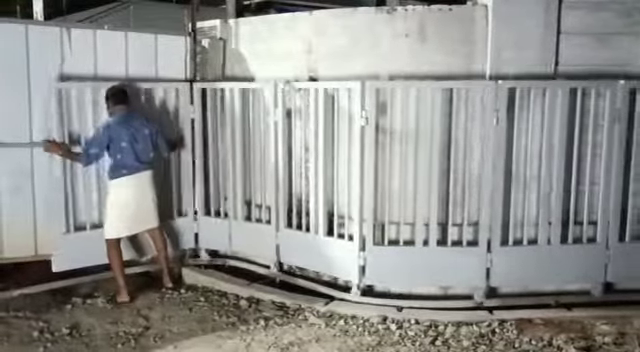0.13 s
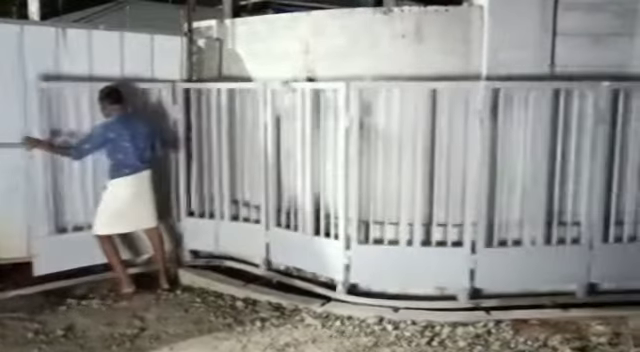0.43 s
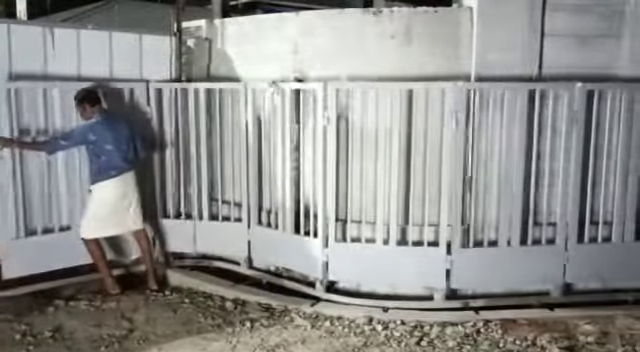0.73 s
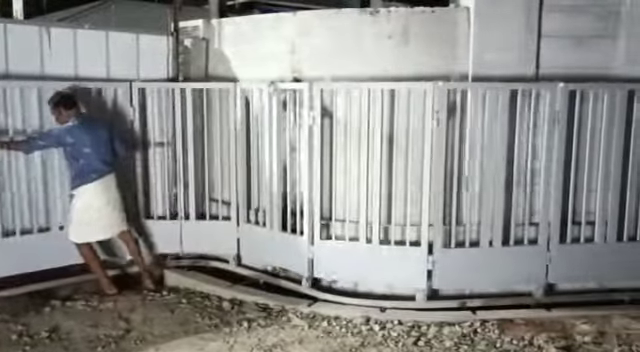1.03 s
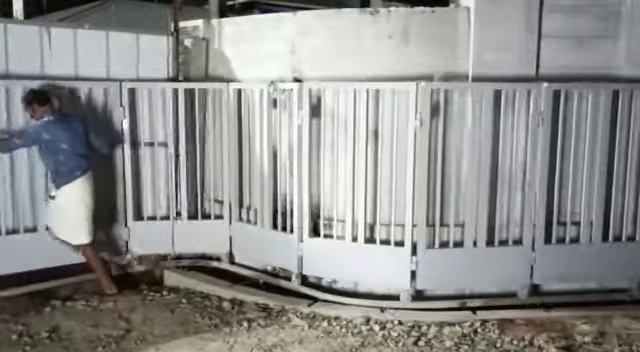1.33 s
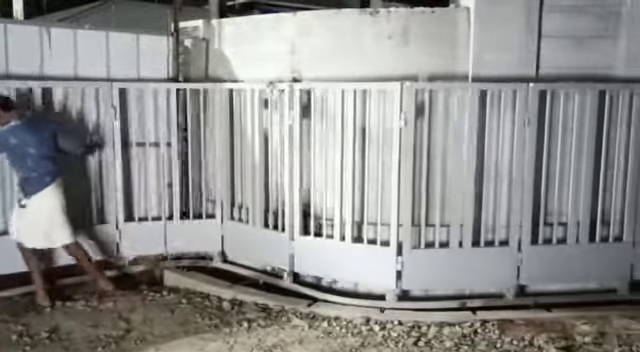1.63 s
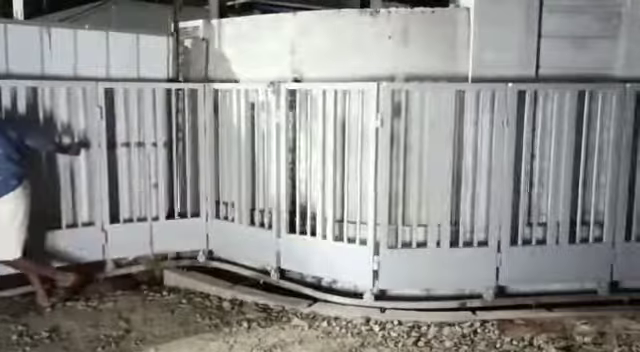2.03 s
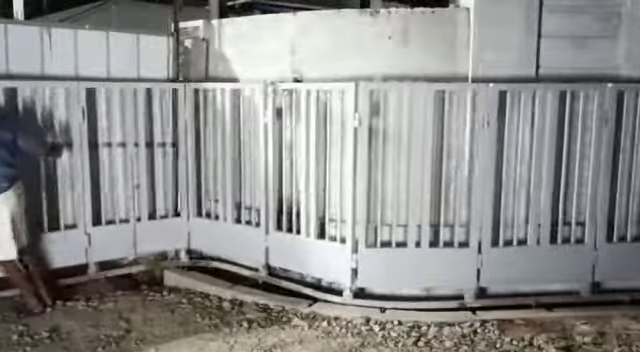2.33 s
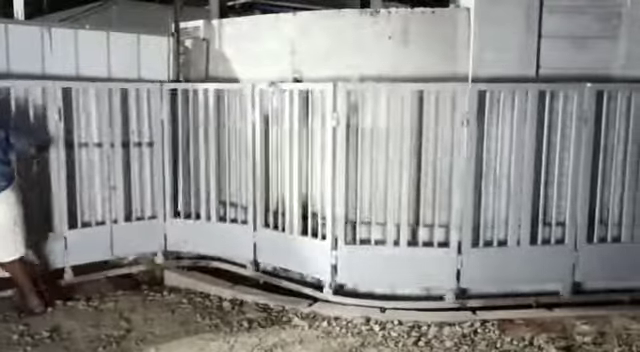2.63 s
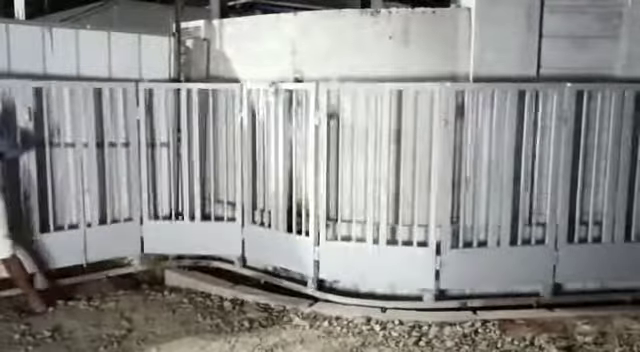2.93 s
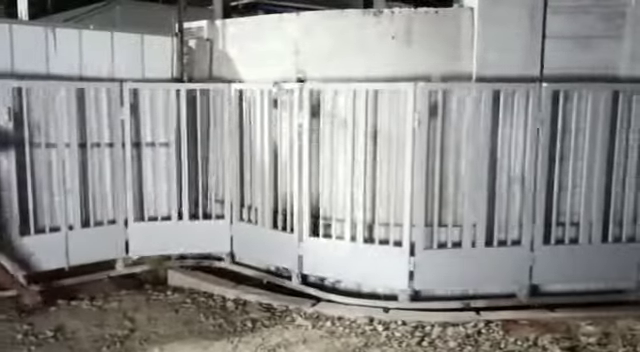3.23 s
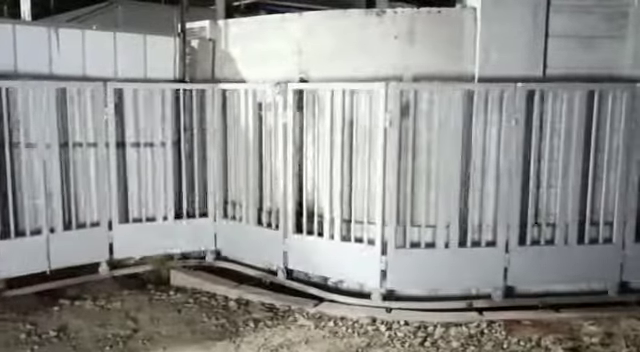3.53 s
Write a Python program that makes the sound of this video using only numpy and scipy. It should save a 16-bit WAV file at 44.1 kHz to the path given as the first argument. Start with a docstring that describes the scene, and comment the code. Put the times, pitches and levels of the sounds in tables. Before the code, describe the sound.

A folding steel gate rolls along a ground track outdoors, its hollow panels rumbling and its bars buzzing. Loose hinges rattle, then a ringing knock and a hard clank sound. The rolling grows louder, with another ring near the end.

```python
"""Over a low outdoor drone, a folding steel gate is pushed along a curved ground track between walls.
From the start its wheels make the hollow panels rumble and the bars buzz, and one wheel sings faintly.
Soon the loose hinges rattle and clink and the wheels clack. At 1.65 s a knock sets a loose bar ringing;
at 2.24 s two leaves slam together with a clank. The gate rolls on, louder as it gathers way,
with lighter knocks of the leaves, and the bar rings again near the end."""
import sys
import numpy as np
from scipy import signal
from scipy.fft import rfft, irfft
from scipy.io import wavfile
from scipy.ndimage import uniform_filter1d

SR = 44100
rng = np.random.default_rng(int(sys.argv[2]) if len(sys.argv) > 2 else 0)


def to_wav(sig):
    """Store sig (one row per channel, or 1-D mono) as 16-bit WAV at the path in sys.argv[1].

    Samples outside -1..1 are clipped; the rate is SR.
    """
    pcm = np.clip(np.atleast_2d(sig), -1, 1) * 32767
    pcm = np.round(pcm).astype(np.int16)
    wavfile.write(sys.argv[1], SR, pcm.T)  # frames by channels


N = 162288
T = np.arange(N) / SR

# How alike the two microphones sound. Each row: frequency in Hz, coherence from 0 to 1.
COHERENCE = [(60, 1), (160, 0.92), (300, 0.89), (550, 0.66), (1000, 0.36), (2000, 0.047), (4000, 0.037),
             (8000, 0.06)]
# Stereo tilt. Each row: frequency in Hz, left over right in dB.
STEREO_TILT = [(200, 0), (1400, 0), (2100, -2), (2450, -6), (3100, .5), (4200, -3), (5000, -1.5),
               (6200, 7.5), (7600, 6.5), (8400, 2), (12000, -0.5)]
# Echo of the yard and dense ringing of the gate. Each row: frequency in Hz, t60 in seconds.
YARD_DECAY = [(150, 0.14), (1000, 0.79), (3000, 0.5), (8000, 0.28), (15000, 0.057)]

# Tone colours of the sources. Each row: frequency in Hz, relative level in dB.
OUTDOOR_COLOUR = [(20, -52), (45, -23), (58, -37), (76, 7.5), (95, 5.5), (125, -4.5), (250, -10),
                  (1000, -56), (8000, -66), (15000, -35.5)]
PANEL_COLOUR = [(25, -33), (55, -38), (90, -8), (122, -9), (170, -4.5), (230, -3.5), (295, -2), (390, -1),
                (450, -6), (520, -20.5), (900, -23), (2500, -79)]
BAR_COLOUR = [(200, -18), (480, -3), (620, 3), (760, 2.5), (880, 5), (1150, 0), (1400, -5), (1900, -2),
              (2800, -11), (4500, -11.5), (4900, -22.5), (6000, -22), (6700, -16), (8400, -20), (9200, -56),
              (13000, -34), (15500, -52)]
HINGE_COLOUR = [(300, -28.5), (900, 8.5), (2000, 5), (2800, 4.5), (3300, 7.5), (4550, 6), (4900, -3),
                (6000, -4), (6400, -0.5), (6780, 8.5), (7050, -16), (7500, 7.5), (7750, -37), (8450, -1),
                (9000, -74), (12500, -16.5), (15500, -30)]
CLACK_COLOUR = [(300, -30), (1000, -19), (2200, -6), (2600, 3), (3200, 0), (3800, 9), (4500, 0),
                (5100, -13.5), (7000, -17), (8500, -8), (9500, -67), (15500, -66)]
PIN_COLOUR = [(500, -35), (1400, -19), (1700, 4.5), (2350, -3.5), (2800, 2), (3700, -5), (4500, -5),
              (5200, -13), (6000, -8), (6500, 4), (7100, -3), (7500, 9.5), (7850, -0.5), (8400, 2),
              (9300, -42), (13000, -16.5), (15500, -55)]
LEAF_COLOUR = [(100, -1), (500, -11.5), (830, -4.5), (1150, 1.5), (1350, -10), (1700, 3.5), (2300, 1),
               (3000, -14), (4100, -3), (5200, -14), (6200, -23.5), (6800, -8), (8300, -10.5), (9300, -49),
               (12500, -30), (15500, -38)]

# Fader curves of the rolling sounds. Each row: time in seconds, relative level in dB.
RUMBLE_FADER = [(0.0, -36), (0.08, -43.5), (0.11, -37.5), (0.16, -41), (0.22, -36), (0.66, -35),
                (1.98, -35.5), (2.07, -31.5), (2.51, -28), (2.53, -29.5), (2.92, -27.5), (3.14, -30.5),
                (3.35, -28), (3.68, -27.5)]
BOOM_FADER = [(0, -50), (.12, -42.5), (.9, -45), (1.35, -47), (1.9, -45.5), (2.15, -42), (2.5, -36.5),
              (2.85, -38), (3.05, -43.5), (3.3, -32.5), (3.5, -32.5), (3.68, -40.5)]
BUZZ_FADER = [(0, -46), (.3, -43), (.7, -41.5), (1.25, -43), (1.55, -42), (1.85, -44), (2.15, -40),
              (2.6, -37.5), (2.9, -38.5), (3.1, -38.5), (3.25, -34.5), (3.5, -37.5), (3.68, -34)]
SQUEAL_FADER = [(0, -67), (.13, -58), (.42, -60), (.55, -64), (1.2, -80), (1.35, -62), (1.45, -80)]

# Panel resonances and the leaves' lowest modes. Each row: pitch in Hz, width in Hz, relative level in dB.
PANEL_MODES = [(190, 25, -9), (212, 14.6, -9.5), (230.7, 17.7, -10.5), (252.9, 13.8, -12.5),
               (284.5, 17, -13), (332.8, 18.6, -11.5), (365.7, 15.3, -14), (401, 29.5, -12)]
BOOM_MODES = [(138.9, 15, -4.5), (166.8, 12, -1)]
# Ringing of the steel parts. Each row: pitch in Hz, relative level in dB, t60 in seconds.
FRAME_MODES = [(820, -2.5, .45), (884, -8, .4), (996, -7, .2), (1098, -5, .27), (1142, -5, .25),
               (1467, -7, .38), (1665, 1, .43), (1695, -3, .25), (1785, 0, .24), (1850, -5, .2),
               (1971, -3, .26), (2132, -6, .33), (2254, -5, .18), (2317, 0, .24), (2369, -6, .27),
               (2676, -7, .3), (2707, -3.5, .38), (3115, -11, .26), (3450, -6, .24), (4080, -9.5, .22)]
HINGE_MODES = [(3120, -5, .14), (4060, -6, .06), (4600, -7, .08), (6390, -4, .1), (6715, -3, .08),
               (6800, -2, .08), (7360, 0, .08), (7470, -2, .08), (7560, -2, .09), (7635, -4, .12),
               (7980, -7, .08), (8390, -6, .08)]
LOOSE_BAR_MODES = [(1640, -2, .14), (1717, 0, .25), (2130, -7, .2), (2295, 1, .11), (3354, -13, .3),
                   (4129, -13, .3), (7470, -3, .08), (7639, -3, .22), (8420, -6, .1)]

# Bursts of hinge chatter. Each row: start and length in seconds, relative level and treble in dB.
RATTLES = [(0.298, 0.056, -41.5, -13), (0.446, 0.083, -42.5, -14), (0.673, 0.074, -41.5, -9),
           (0.811, 0.032, -45, 2.5), (0.927, 0.035, -44.5, -2), (1.017, 0.09, -41, -1),
           (1.182, 0.025, -48.5, -1), (1.287, 0.025, -44, -14), (1.361, 0.025, -42, -3.5),
           (1.525, 0.087, -47.5, -2), (1.922, 0.034, -37, 1), (2.008, 0.035, -40, -0.5),
           (2.173, 0.1, -42, -18), (2.264, 0.19, -35.5, 5.5), (2.557, 0.036, -39.5, 2),
           (2.644, 0.028, -37.5, 0), (2.725, 0.045, -37, -4.5), (2.864, 0.045, -36.5, 2),
           (2.927, 0.026, -36.5, 5), (3.184, 0.033, -39, -20), (3.215, .12, -37, -6.5),
           (3.39, 0.034, -39, -4), (3.461, 0.043, -38, 0.5), (3.573, 0.051, -34.5, 1.5)]
# Wheel clacks. Each row: start in seconds, relative level and treble in dB, decay time in seconds.
CLACKS = [(.302, -45, 5, .009), (.332, -44, -13, 0.01), (1.53, -38.5, 3, 0.0098), (1.925, -40, 16.5, 0.01),
          (2.272, -24, -14, 0.0055), (2.368, -20, -10, .007), (2.713, -29.5, -2.5, 0.0043),
          (2.929, -34, -6, 0.0093), (3.468, -41, -8, .006)]
# Knocks of the hinge pins. Each row: start in seconds, relative level and treble in dB.
CLINKS = [(.447, -41.5, -0.5), (.671, -38, 2), (.705, -37, 0), (1.022, -41, -10), (1.527, -42.5, -2),
          (1.645, -39, 3), (1.655, -35, 2.5), (1.938, -32.5, -3), (2.086, -37, -15), (2.304, -39, 3.5),
          (2.417, -41, 0), (2.542, -53, 5), (2.648, -37.5, -7.5), (2.883, -36.5, -1), (3.363, -35, 3),
          (3.372, -29, 5.5)]
# Strikes on the loose bar. Each row: start in seconds, relative level and treble in dB.
PINGS = [(1.647, -12.5, -8), (1.654, -8, -3), (3.371, -13, 10), (3.376, -3, -9)]
# The leaves knock together; the hardest blow bounces.
# Each row: start in seconds, relative level and treble in dB, frame ring in dB above that level.
CLANKS = [(1.655, -39, 16, -2), (2.199, -41, -11, 20), (2.2427, -20.5, 5.5, 13), (2.2455, -17.5, 5, 24),
          (2.26, -22.5, -22, 12), (3.221, -33.5, -16, 21), (3.376, -26.5, -12, 12), (3.6, -44, -7, 19)]


def amp(db):
    """Decibels to gain."""
    return 10 ** (np.asarray(db) / 20)


def unit_rms(x):
    """Scales to an rms of one."""
    return x / np.sqrt(np.mean(x ** 2) + 1e-20)


def unit_energy(x):
    """Scales a stereo response to an average energy of one per channel."""
    return x / np.sqrt(np.sum(x ** 2) / 2 + 1e-20)


def at_hz(points, hz):
    """Reads a table along log frequency."""
    freqs, values = np.transpose(points)
    return np.interp(np.log(hz + 1), np.log(freqs + 1), values)


def fader(points):
    """Gain over time from a dB curve."""
    return amp(np.interp(T, *np.transpose(points)))


def add(mix, start_s, sound):
    """Drops a sound into the mix at its cue."""
    part = mix[:, round(start_s * SR):][:, :sound.shape[1]]
    part += sound[:, :part.shape[1]]


def convolve(x, response):
    """Plays a signal through a stereo response."""
    return signal.fftconvolve(np.atleast_2d(x), response, axes=1)[:, :N]


def colour(pair, tone):
    """Gives two unrelated signals a tone colour and the stereo width of the microphones."""
    hz = abs(np.fft.fftfreq(pair.shape[1], 1 / SR))
    log_gain = np.log(amp(at_hz(tone, hz)))
    eq = np.exp(np.conj(signal.hilbert(log_gain)))  # minimum phase keeps attacks crisp
    alike = at_hz(COHERENCE, hz)
    mid, side = np.fft.fft(pair) * eq * np.sqrt([1 + alike, 1 - alike])
    return np.fft.ifft([mid + side, mid - side]).real


def sing(hz, width_hz):
    """A steep-sided resonance kept going by random shaking."""
    t = np.arange(SR) / SR
    mode = t * np.exp(-np.pi * width_hz * t) * np.sin(2 * np.pi * hz * t)
    return unit_rms(signal.fftconvolve(rng.standard_normal(N + SR - 1), mode, "valid"))


def ring(modes):
    """Decaying partials, each reaching the two microphones with a phase gap set by their coherence."""
    t, out = np.arange(SR) / SR, 0
    for hz, db, t60 in modes:
        gap = np.arccos(at_hz(COHERENCE, hz)) * rng.choice([-1, 1]) * np.array([[.5], [-.5]])
        phase = 2 * np.pi * (hz * t + rng.random())
        out = out + amp(db - 60 * t / t60) * np.sin(phase + gap)
    return unit_energy(out)


def yard_tail():
    """A diffuse tail that hangs longest in the mids and dies first in the treble."""
    hz, t, spectrum = signal.stft(rng.standard_normal((2, SR)), SR, nperseg=256)
    decay = amp(-60 * t / at_hz(YARD_DECAY, hz)[:, None])
    tail = signal.istft(spectrum * decay, SR, nperseg=256)[1]
    fade_in = 1 - np.exp(-np.arange(tail.shape[1]) / SR / 0.0021)
    return unit_energy(tail * fade_in)


def contacts(count, per_s, spread_db):
    """Tiny metal contacts of uneven size at random moments."""
    size = amp(spread_db * np.minimum(rng.exponential(1, count), 4))
    touching = rng.random(count) < per_s / SR
    return unit_rms(size * touching * rng.standard_normal((2, count)))


def treble_shelf(x, treble_db, corner_hz=5200):
    """Lifts or lowers the top of a short sound."""
    low = signal.sosfiltfilt(signal.butter(2, corner_hz, "low", fs=SR, output="sos"), x)
    return low + amp(treble_db) * (x - low)


def blows(rows, decay_s):
    """Each blow is a dense crack that spreads through the metal and dies quickly."""
    drive, t = np.zeros((2, N)), np.arange(SR // 8) / SR
    for start, db, treble_db in rows:
        crack = rng.choice([-1., 1.], (2, len(t))) * np.exp(-t / decay_s)
        add(drive, start, amp(db) * treble_shelf(crack, treble_db))
    return drive


def steel(drive, tone, modes, ring_db, tail_db):
    """Contacts sound through a steel part: its colour, its ringing modes and the yard's tail."""
    wet = drive + amp(tail_db) * convolve(drive, yard_tail())
    body = unit_rms(colour(wet, tone)) * np.sqrt(np.mean(wet ** 2))
    return body + amp(ring_db) * convolve(drive[0], ring(modes))


def outdoor_drone():
    """A steady bed of low outdoor noise."""
    return amp(-45.5) * unit_rms(colour(rng.standard_normal((2, N)), OUTDOOR_COLOUR))


def panel_rumble():
    """The rough track shakes the hollow panels; their lowest modes swell as the leaves flex."""
    body = amp(-3) * unit_rms(colour(rng.standard_normal((2, N)), PANEL_COLOUR))
    modes = sum(amp(db) * sing(hz, width) for hz, width, db in PANEL_MODES)
    boom = sum(amp(db) * sing(hz, width) for hz, width, db in BOOM_MODES)
    return amp(-2.68) * fader(RUMBLE_FADER) * (body + modes) + fader(BOOM_FADER) * boom


def bar_buzz(uneven_db=1.74):
    """Grit under the wheels keeps the bars buzzing, unevenly along the track."""
    roughness = uniform_filter1d(uniform_filter1d(rng.standard_normal(N), size=1100), size=500)
    flutter = amp(uneven_db * unit_rms(roughness))
    grit = contacts(N, per_s=5000, spread_db=1) * fader(BUZZ_FADER) * flutter
    return amp(-1) * steel(grit, BAR_COLOUR, FRAME_MODES, ring_db=-25.5, tail_db=-6)


def wheel_squeal():
    """A wheel rubbing on the rail holds a faint, thin note."""
    return fader(SQUEAL_FADER) * sing(hz=3220, width_hz=150)


def hinge_rattles(attack_s=0.005, release_s=0.012, fade_db_per_s=25):
    """A loose hinge chatters for a moment, then settles."""
    drive, t = np.zeros((2, N)), np.arange(SR // 3) / SR
    for start, length, db, treble_db in RATTLES:
        release = np.exp(-np.maximum(t - length, 0) / release_s)
        envelope = np.minimum(t / attack_s, 1) * release * amp(-fade_db_per_s * t)
        chatter = envelope * contacts(len(t), per_s=2600, spread_db=1.5)
        add(drive, start, amp(db) * treble_shelf(chatter, treble_db))
    return amp(-1.5) * steel(drive, HINGE_COLOUR, HINGE_MODES, ring_db=-12.5, tail_db=-4)


def wheel_clacks():
    """The wheels hit the rail with short, dry knocks."""
    drive = sum(blows([row[:3]], decay_s=row[3]) for row in CLACKS)
    return steel(drive, CLACK_COLOUR, HINGE_MODES, ring_db=-37, tail_db=-10.5)


def pin_clinks():
    """The hinge pins knock in their eyes, one bright clink at a time."""
    return steel(blows(CLINKS, decay_s=0.011), PIN_COLOUR, HINGE_MODES, ring_db=-22, tail_db=-8.5)


def bar_pings():
    """A loose bar rings out on two of the knocks, struck twice each time."""
    out = np.zeros((2, N))
    for start, db, treble_db in PINGS:
        add(out, start, amp(db) * treble_shelf(ring(LOOSE_BAR_MODES), treble_db))
    return out


def leaf_clanks(touch_db=4, touch_decay_s=0.008):
    """Each knock of the leaves cracks and sets the whole frame ringing, hard at first, then freely."""
    cracks = blows([row[:3] for row in CLANKS], decay_s=0.006)
    out = steel(cracks, LEAF_COLOUR, HINGE_MODES, ring_db=-39, tail_db=-5.5)
    t = np.arange(SR) / SR
    punch = 1 + amp(touch_db) * np.exp(-t / touch_decay_s)  # extra ring while the leaves still touch
    frame = ring(FRAME_MODES) * punch
    for start, db, _, ring_db in CLANKS:
        add(out, start, amp(db + ring_db) * frame)
    return out


def scene():
    """The rolling gate and its knocks over a low outdoor drone."""
    bed = outdoor_drone() + panel_rumble() + bar_buzz() + wheel_squeal()
    return bed + hinge_rattles() + wheel_clacks() + pin_clinks() + bar_pings() + leaf_clanks()


def record(dry):
    """The two microphones differ in colour and shed the deepest bass and the very top."""
    low_cut_hz, high_cut_hz = 52.6, 15300
    tilt_db = at_hz(STEREO_TILT, np.fft.rfftfreq(2 * N, 1 / SR)) * np.array([[.5], [-.5]])
    tilted = irfft(rfft(dry, 2 * N) * amp(tilt_db))[:, :N]
    low_cut = signal.butter(4, low_cut_hz, "high", fs=SR, output="sos")
    high_cut = signal.firwin(511, high_cut_hz, window=("kaiser", 9), fs=SR)
    return signal.oaconvolve(signal.sosfilt(low_cut, tilted), high_cut[None], "same")


dry = scene()
out = record(dry)
to_wav(out)
```